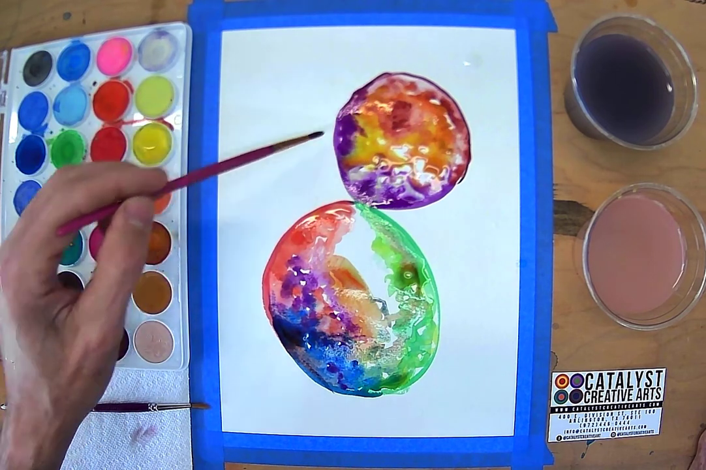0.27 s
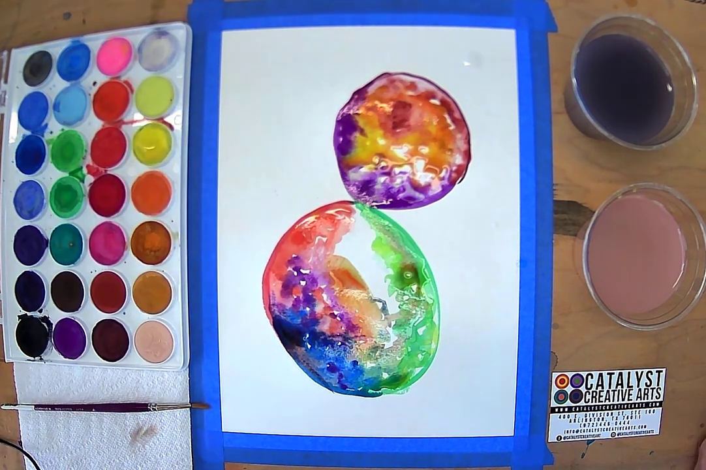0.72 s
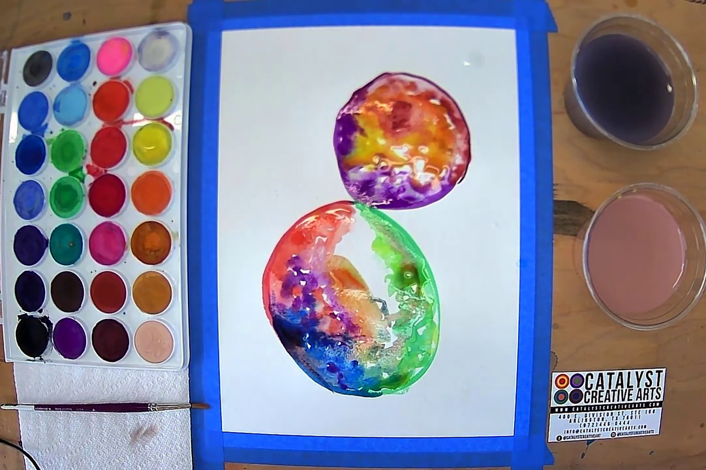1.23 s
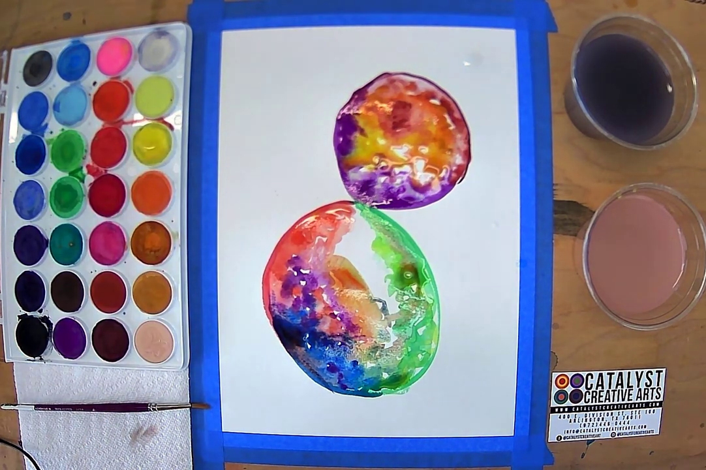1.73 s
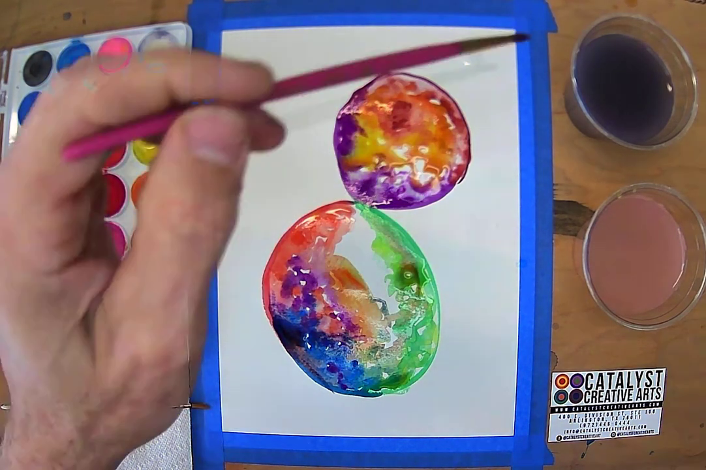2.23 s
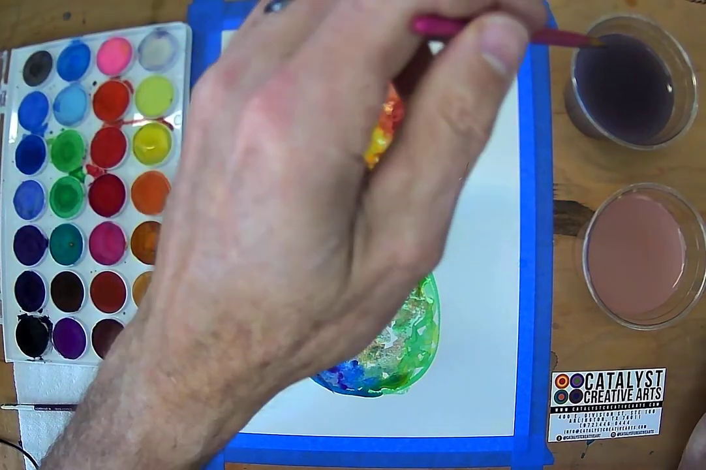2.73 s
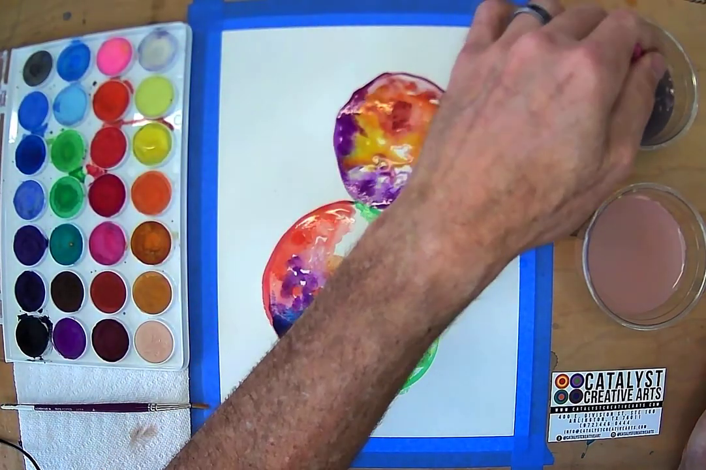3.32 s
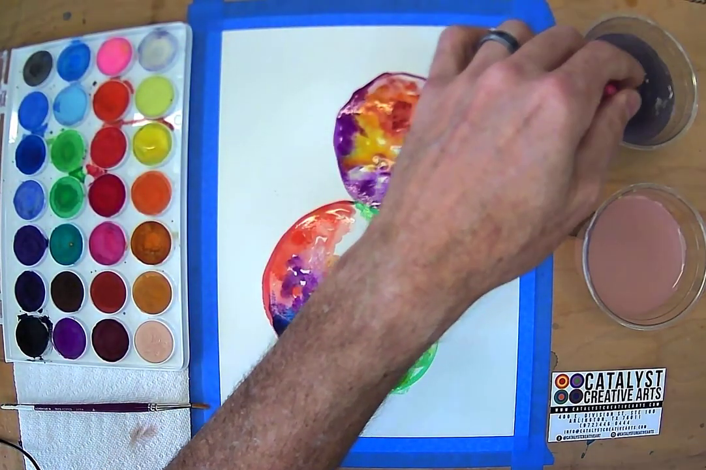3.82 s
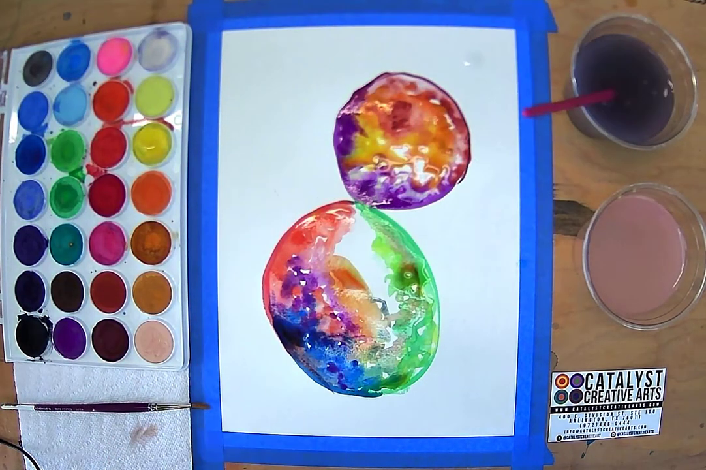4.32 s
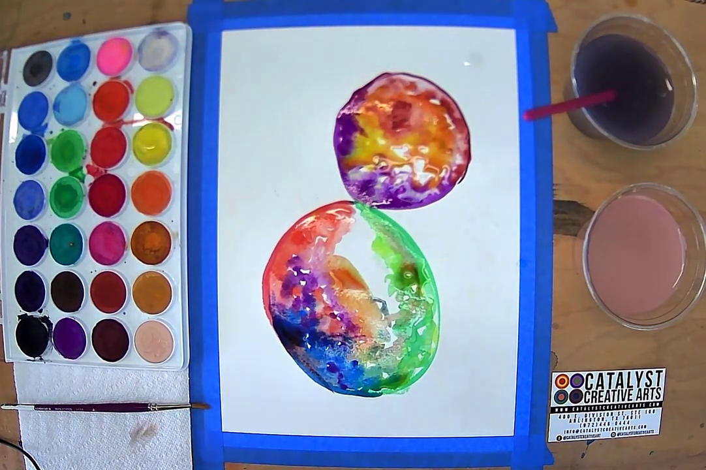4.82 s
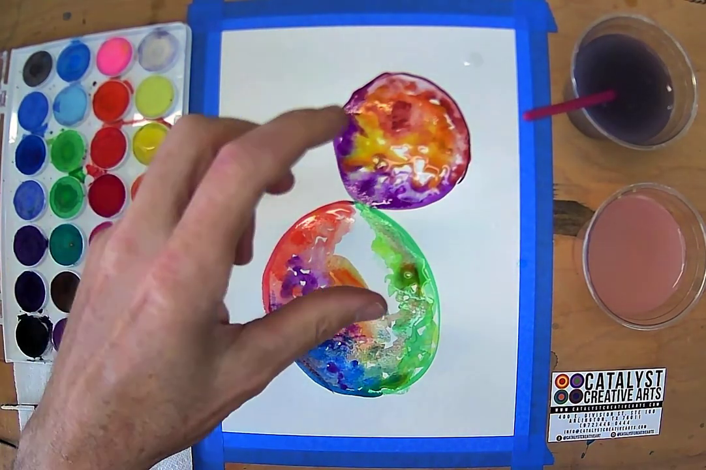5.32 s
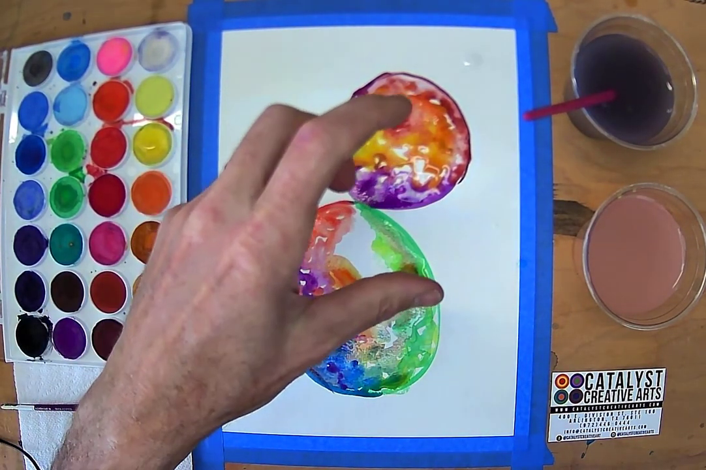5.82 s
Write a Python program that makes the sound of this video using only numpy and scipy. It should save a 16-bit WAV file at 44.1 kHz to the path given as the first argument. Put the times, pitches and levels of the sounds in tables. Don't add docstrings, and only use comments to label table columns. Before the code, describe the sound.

Close, mono sound of a painter's table indoors: steady low air noise and hum, a wooden tap and lighter flick, faint hissing bristles with tiny squeaks, a short hollow dragging judder. Later a dry wipe, a ringing plastic rim strike with fading rattles, then the brush drops hard, thumps the table and bounces; faint ticks follow.

```python
import sys
import numpy as np
from scipy import signal
from scipy.fft import rfft, irfft
from scipy.io import wavfile
from scipy.ndimage import uniform_filter1d

SR = 44100
rng = np.random.default_rng(int(sys.argv[2]) if len(sys.argv) > 2 else 0)


def voltage_ratio(level):
    return 10 ** (np.asarray(level, float) / 20)


def log_audio(samples):
    frames = np.atleast_2d(samples).T
    limited = np.clip(frames, -1, 1)
    pcm = np.round(limited * 32767).astype(np.int16)
    wavfile.write(sys.argv[1], SR, pcm)


N = 267417


def rms_one(x):
    return x / np.sqrt(np.mean(x ** 2) + 1e-20)


def at_hz(points, hz):
    table_hz, values = np.transpose(points)
    return np.interp(np.log(hz), np.log(table_hz), values)


def resonate(x, hz, width_hz):
    r = np.exp(-np.pi * width_hz / SR)
    poles = [1, -2 * r * np.cos(2 * np.pi * hz / SR), r * r]
    return signal.lfilter(np.array([1, 0, -1]) * (1 - r * r) / 2, poles, x)


def bandpass(x, order, low_hz, high_hz):
    return signal.sosfilt(signal.butter(order, [low_hz, high_hz], "band", fs=SR, output="sos"), x)


def body(x, peaks):
    return sum((-1) ** k * voltage_ratio(db) * resonate(x, hz, width) for k, (hz, width, db) in enumerate(peaks))


def drift(hz):
    r = np.exp(-2 * np.pi * hz / SR)
    noise = rng.standard_normal(N + SR)
    return rms_one(signal.lfilter([1], [1, -2 * r, r * r], noise)[SR:])


def add(out, sound, s):
    i = round(s * SR)
    out[i:i + len(sound)] += sound[:N - i]


def fade(t60, size):
    return voltage_ratio(-60 * np.arange(size) / SR / max(t60, .002))


def gesture_db(s, hold, db, fall, rise):
    t = np.arange(N) / SR
    return db - abs(rise) * np.maximum(s - t, 0) - abs(fall) * np.maximum(t - s - hold, 0)


def blows(events, peaks, echo, narrow, low_hz, top_hz):
    size = 4096
    out, t = np.zeros(N), np.arange(size) / SR
    for s, peak_db, chatter, wet_db in events:
        rough = rng.standard_normal(size) * (1 - np.exp(-t / 0.00049))
        rough[24] += 7
        knock = 0
        for k, (hz, width, db) in enumerate(peaks):
            push = rough * fade(chatter * (2000 / hz) ** 0.47, size)
            ring = resonate(resonate(push, hz, narrow * width), hz, 5 * width)
            knock = knock + (-1) ** k * voltage_ratio(db) * np.sqrt(width) * rms_one(ring)
        knock = bandpass(knock, 4, low_hz, top_hz)
        knock *= voltage_ratio(peak_db - 9.5) / np.std(knock[:300])
        add(out, knock, s - .0006)
        add(out, voltage_ratio(wet_db) * signal.fftconvolve(knock, echo), s)
    return out


def tap(echo):
    # start in seconds, peak in dB, contact chatter t60 in seconds, room share in dB
    tap_blows = [
        (0.709, -53, 0.024, -17),
        (0.7145, -32.5, 0.085, -11),
        (0.7175, -17.5, 0.02, -20),
    ]
    # resonance of handle and wood in Hz, width in Hz, level in dB
    tap_peaks = [(950, 300, -3.5), (1610, 210, 3), (2140, 140, -6), (2270, 160, -4), (2800, 190, -0.5),
                 (3420, 125, -1), (4220, 120, -4), (4990, 190, -6), (5600, 220, -4.5), (6230, 360, -7),
                 (7150, 81, -65), (7400, 350, -19)]
    return blows(tap_blows, tap_peaks, echo, narrow=0.98, low_hz=790, top_hz=8300)


def flick(echo):
    # start in seconds, peak in dB, contact chatter t60 in seconds, room share in dB
    flick_blows = [
        (0.9619, -45.5, 0.081, -15),
        (0.9734, -27, 0.018, -32),
    ]
    # resonance of the flicked handle in Hz, width in Hz, level in dB
    flick_peaks = [(1235, 98, 0.5), (1426, 200, 2.5), (1770, 250, -13), (4150, 170, 0), (4740, 100, 0),
                   (5330, 140, -1), (5770, 130, -3), (7050, 140, -7), (8050, 250, -15.5)]
    return blows(flick_blows, flick_peaks, echo, narrow=0.68, low_hz=1100, top_hz=9000)


def rim_knock(echo):
    # start in seconds, peak in dB, contact chatter t60 in seconds, room share in dB
    rim_blows = [
        (3.8822, -17, 0.022, -22),
        (3.901, -32, 0.035, -25),
    ]
    # resonance of the cup in Hz, width in Hz, level in dB
    rim_peaks = [(607, 75, -5), (865, 117, 4), (1122, 57, 9), (1320, 170, -2), (1760, 71, -8),
                 (1950, 124, 1), (2540, 104, 0.5), (3330, 430, -10), (4650, 120, -6), (5400, 240, -9.5),
                 (6650, 200, -16.5), (8250, 350, -21)]
    return blows(rim_blows, rim_peaks, echo, narrow=0.72, low_hz=634, top_hz=8850)


def rattle(echo):
    # start in seconds, peak in dB, contact chatter t60 in seconds, room share in dB
    rattle_blows = [
        (3.953, -33, 0.03, -9.5),
        (3.981, -36.5, 0.03, -26),
        (3.993, -40, 0.019, -16),
        (4.006, -42, 0.03, -27),
        (4.02, -46, 0.027, -20),
    ]
    # resonance of the rattling cup in Hz, width in Hz, level in dB
    rattle_peaks = [(894, 74, -1), (1147, 45, 2.5), (1320, 75, -8), (1960, 81, -10), (2490, 77, -14),
                    (3560, 300, -27), (4730, 250, -19.5), (5514, 300, -24), (7960, 400, -40)]
    return blows(rattle_blows, rattle_peaks, echo, narrow=1.5, low_hz=700, top_hz=8460)


def drop(echo):
    # start in seconds, peak in dB, contact chatter t60 in seconds, room share in dB
    drop_blows = [
        (4.4038, -22.5, 0.015, -22.5),
        (4.4054, -4.5, 0.013, -23.5),
        (4.409, -19, 0.01, -21.5),
    ]
    # resonance of cup and brush in Hz, width in Hz, level in dB
    drop_peaks = [(919, 100, 3.5), (1211, 77, -4), (1600, 120, 1), (2405, 110, 1.5), (3024, 130, -10),
                  (3820, 240, -2.5), (4900, 91, -8), (5250, 210, -8), (6300, 200, -5.5), (6510, 94, -15),
                  (7100, 540, -9), (8080, 420, -16.5), (9570, 210, -15), (10650, 270, -19),
                  (12000, 393, -20), (15200, 900, -27)]
    return blows(drop_blows, drop_peaks, echo, narrow=1.5, low_hz=790, top_hz=17500)


def bounce(echo):
    # start in seconds, peak in dB, contact chatter t60 in seconds, room share in dB
    bounce_blows = [
        (4.429, -37.5, .02, -26.5),
        (4.4328, -19, .01, -38),
    ]
    # resonance of the bouncing brush in Hz, width in Hz, level in dB
    bounce_peaks = [(1050, 280, -8), (2898, 280, -8), (3370, 98, -8.5), (4100, 430, -13.5), (5360, 180, 1),
                    (6250, 200, -5), (7745, 380, -6), (9800, 240, -15.5), (11600, 320, -8.5),
                    (15100, 510, -13.5)]
    return blows(bounce_blows, bounce_peaks, echo, narrow=2.4, low_hz=800, top_hz=16500)


def table_thump():
    # time in seconds, push in dB
    table_pushes = [
        (4.4081, 4.5),
        (4.417, -9.5),
        (4.43, -13.5),
    ]
    # table mode in Hz, level in dB, t60 in seconds
    table_modes = [(70.9, -38.5, .08), (110, -36, .1), (143, -40, .12), (193.2, -28, 0.096),
                   (297, -27.5, 0.04), (378, -34.5, 0.047)]
    pushes, out = np.zeros(N), np.zeros(N)
    for s, db in table_pushes:
        add(pushes, voltage_ratio(db) * np.hanning(40) / 20, s)
    for hz, db, t60 in table_modes:
        r, w = voltage_ratio(-60 / (t60 * SR)), 2 * np.pi * hz / SR
        poles = [1, -2 * r * np.cos(w), r * r]
        out += signal.lfilter([0, voltage_ratio(db) * np.sin(w)], poles, pushes + 1e-18)
    return out


def jar():
    # time in seconds, hollow tone in dB
    hand_pressure = [(1.2, -85), (1.232, -62), (1.292, -61), (1.344, -51), (1.464, -46.5), (1.532, -50.5),
                     (1.68, -61), (1.71, -64), (1.85, -69)]
    # lower hollow mode in Hz, width in Hz, level in dB
    low_modes = [(352, 29, -8), (475, 13, 4.5), (575, 20, -1.5)]
    # upper hollow mode in Hz, width in Hz, level in dB
    high_modes = [(686, 17, 9), (758, 43, 3.5), (800, 33, 1), (960, 31, -1.5)]
    # time of the top in seconds, peak in dB, tone in Hz, half-length in seconds
    jolts = [(1.237, -55, 588, 0.022), (1.24, -50.5, 474, 0.013), (1.355, -31, 475, 0.011),
             (1.398, -36, 500, 0.0027), (1.409, -35, 570, 0.005), (1.42, -31.5, 500, 0.0024),
             (1.428, -49, 437, 0.0046), (1.465, -32, 475, 0.011), (1.475, -37.5, 586, 0.0099),
             (1.489, -37.5, 532, 0.0031), (1.501, -41, 591, 0.0095), (1.511, -44, 693, 0.0037),
             (1.55, -38, 520, 0.0037), (1.579, -44.5, 572.5, 0.015), (1.592, -50.5, 790, 0.0065),
             (1.619, -46.5, 477.5, 0.042), (1.652, -46, 586, 0.008), (1.668, -50, 500, 0.0055)]
    low_jolts = [
        (1.278, -55, 100, .01),
        (1.292, -43, 91.3, 0.009),
        (1.374, -54, 105, 0.015),
        (1.399, -49, 101, 0.017),
    ]
    # start in seconds, hold in seconds, rumble in dB, fall in dB per s
    bumps = [
        (1.283, 0.016, -47.5, 401),
        (1.35, 0.064, -47.5, 600),
        (1.5, 0.025, -60.5, 400),
        (1.777, .015, -63, 300),
        (1.9, .02, -68, 300),
        (5.55, .5, -72, 100),
    ]
    t = np.arange(N) / SR
    friction = rng.standard_normal((3, N)) * voltage_ratio(2.2 * drift(30))
    low = rms_one(body(friction[0], low_modes))
    high = rms_one(body(friction[1], high_modes))
    rumble = rms_one(bandpass(friction[2], 2, 45, 130))

    drag_s, drag_db = np.transpose(hand_pressure)
    tone_db = np.interp(t, drag_s, drag_db, -150, -150)
    upper_db = -60 + np.interp(t - 0.053, t, tone_db) + 50.5
    low_gain, high_gain = uniform_filter1d(voltage_ratio(np.array([tone_db, upper_db])), size=300)
    rumble_gain = sum(voltage_ratio(gesture_db(*bump, rise=692)) for bump in bumps)
    out = low_gain * low + high_gain * high + rumble_gain * rumble
    for s, db, hz, half in jolts + low_jolts:
        out += voltage_ratio(db) * np.exp(-((t - s) / half) ** 2) * np.sin(2 * np.pi * hz * t)
    return out


def wipes():
    # start in seconds, hold in seconds, level in dB, fall in dB per s, lower resonance share in dB
    paper_strokes = [
        (0.73, .012, -52.5, 320, -1),
        (0.8, 0.064, -61.5, 500, -4.5),
        (2.378, 0.028, -43.5, 498, -18.5),
        (2.465, .06, -67, 250.5, 1),
    ]
    towel_strokes = [
        (0.98, 0.038, -53.5, 214, -5.5),
        (1.215, .01, -71, 252, 0),
        (1.412, .01, -69.5, 220, -6),
        (1.87, 0.18, -78.5, 350, 3),
        (3.57, 0.02, -79, 300, 8),
    ]
    cup_strokes = [
        (3.892, 0.0056, -61.5, 148, 3),
        (5.065, 0.028, -68, 600, -6),
        (5.665, 0.058, -78.5, 300, 2.5),
    ]
    # upper band in Hz, its width in Hz, lower resonance in Hz, its width in Hz
    paper, towel, cup = (6250, 1460, 4150, 450), (6180, 1600, 4380, 450), (6500, 2000, 4750, 200)
    # centre in Hz, width in Hz, level in dB
    outer_bands = [(1430, 420, 4), (8420, 680, -10.5)]
    clumps_db = [1.6 * drift(150) + 1.1 * drift(25) for band in range(3)]
    slips = rng.standard_normal((3, N)) * voltage_ratio(clumps_db)
    outer, out = body(slips[2], outer_bands), np.zeros(N)
    for strokes, surface in [(paper_strokes, paper), (towel_strokes, towel), (cup_strokes, cup)]:
        top_hz, top_width, hz, width = surface
        top = rms_one(bandpass(slips[0], 6, top_hz - top_width / 2, top_hz + top_width / 2))
        low = rms_one(resonate(resonate(slips[1], hz, width), hz, 2 * width)) + 3.0 * outer
        for *stroke, low_db in strokes:
            gain = uniform_filter1d(voltage_ratio(gesture_db(*stroke, rise=4000)), size=80)
            out += gain * (top + voltage_ratio(low_db) * low)
    return out


def squeaks():
    # start in seconds, length in seconds, peak in dB, first pitch in Hz, last pitch in Hz
    glides = [
        (0.809, 0.036, -64, 4550, 4750),
        (1.0, 0.069, -58, 5350, 6050),
        (2.426, 0.027, -64, 5900, 6200),
        (2.5, 0.051, -66, 4150, 4550),
    ]
    out = np.zeros(N)
    flutter_filter = signal.butter(2, 110, fs=SR, output="sos")
    for s, length, db, from_hz, to_hz in glides:
        size = int(length * SR)
        flutter = signal.sosfilt(flutter_filter, rng.standard_normal((2, 6000)))[:, -size:]
        phase = 2 * np.pi * np.cumsum(np.linspace(from_hz, to_hz, size)) / SR
        squeak = rms_one(flutter[0] * np.sin(phase) + flutter[1] * np.cos(phase))
        add(out, voltage_ratio(db) * np.hanning(size) ** .5 * squeak, s)
    return out


def ticks():
    # start in seconds, peak in dB, pitch in Hz, t60 in seconds
    specks = [(0.679, -53, 6200, 0.09), (0.78, -53, 1600, 0.083), (0.794, -45.5, 6250, 0.022),
              (0.86, -52, 6370, .03), (1.343, -50, 520, .03), (1.546, -54, 560, .025),
              (2.629, -48.5, 3980, 0.028), (2.636, -48, 4770, 0.065), (2.637, -55, 1450, 0.054),
              (3.491, -56, 1600, 0.035), (3.592, -58, 4900, .03), (3.974, -60, 5100, 0.026),
              (3.982, -50, 4750, 0.025), (3.983, -63, 5800, .03), (4.401, -39, 5600, .02),
              (4.4012, -31.5, 1540, .03), (4.42, -32, 1000, .025), (4.508, -49, 278, 0.046),
              (5.068, -54, 6800, 0.045), (5.072, -55, 4750, .05), (5.09, -52.5, 4750, .04)]
    out = np.zeros(N)
    for s, db, hz, t60 in specks:
        contact = rng.standard_normal(3000) * fade(t60, 3000)
        tick = resonate(resonate(contact, hz, 260), hz, 600)
        add(out, voltage_ratio(db) * tick / np.abs(tick).max(), s)
    return out


def room_echo():
    # frequency in Hz, t60 in seconds
    room_t60 = [(200, 0.24), (1200, 0.27), (4000, 0.13), (9000, .12), (16000, .09)]
    size, rise_s, hold_s = SR // 2, .018, .05
    edges = 60 * 2. ** np.arange(9)
    echo = 0
    for low, high in zip(edges, edges[1:]):
        band = bandpass(rng.standard_normal(size), 2, low, high)
        t60 = at_hz(room_t60, np.sqrt(low * high))
        decay = np.minimum(fade(t60, size) * voltage_ratio(60 * hold_s / t60), 1)
        dulling = voltage_ratio(-1.5 * np.log2(low / 1000))
        echo = echo + dulling * band * decay
    echo = echo * np.clip(np.arange(size) / SR / rise_s, 0, 1)
    return echo / np.sqrt(np.sum(echo ** 2))


def ventilation(stir_db):
    # frequency in Hz, density in dB per Hz
    air = [(14, -58), (40, -21), (100, -9), (200, -5.5), (300, -10), (600, -18.5), (1000, -16.5),
           (2000, -22.5), (3060, -15), (4200, -26.5), (6700, -31.5), (7700, -46.5), (11000, -51),
           (16500, -56.5)]
    # centre in Hz, width in Hz, level in dB
    duct_peaks = [(484, 97, 3), (880, 67, 3), (2500, 250, 1.5), (3130, 1200, 1.5)]
    hz = np.maximum(np.fft.rfftfreq(N, 1 / SR), 1)
    shape_db = at_hz(air, hz)
    for f, width, db in duct_peaks:
        shape_db = shape_db + db / (1 + (2 * (hz - f) / width) ** 2)
    middle = (hz > 1000) & (hz < 5000)
    shape = voltage_ratio(shape_db) / np.sqrt(np.sum(voltage_ratio(2 * shape_db)[middle]) / len(hz))
    out = voltage_ratio(-66 + stir_db) * irfft(rfft(rng.standard_normal(N)) * shape, N)
    bass = signal.sosfiltfilt(signal.butter(2, 910, fs=SR, output="sos"), out)
    still = uniform_filter1d(1. * (np.arange(N) < 0.69 * SR), size=4000)
    return out - (1 - voltage_ratio(-4.5)) * bass * still


def room_modes(stir_db):
    mode_hz = (118.73, 154.2)
    width_hz, evening = 3.9, .6
    levels_db = [-70 + 1.76 * stir_db, -84.5 + 3.5 * np.arange(N) / SR]
    out = np.zeros(N)
    for hz, db in zip(mode_hz, levels_db):
        mode = resonate(resonate(rng.standard_normal(N + SR), hz, width_hz), hz, 3 * width_hz)[SR:]
        swell = uniform_filter1d(mode ** 2, size=2000) + 1e-12
        out += voltage_ratio(db) * rms_one(mode / swell ** (evening / 2))
    return out


def motor_hum():
    # frequency in Hz, level in dB rms
    hum_lines = [
        (411.5, -68.5),
    ]
    out = np.zeros(N)
    for hz, db in hum_lines:
        level = np.sqrt(2) * voltage_ratio(db + .4 * drift(4))
        out += level * np.sin(2 * np.pi * np.cumsum(hz + .3 * drift(3)) / SR)
    return out


def background():
    # start in seconds, hold in seconds, swell in dB, fall in dB per s
    stirs = [
        (0.898, 0.56, 3.5, 12.5),
        (2.318, 0.22, 2.04, 5),
        (3.953, 0.056, 3, 11),
    ]
    stir_db = np.max([np.maximum(gesture_db(*stir, rise=19), 0) for stir in stirs], axis=0)
    return ventilation(stir_db) + room_modes(stir_db) + motor_hum()


def scene():
    echo = room_echo()
    knocks = tap(echo) + flick(echo) + rim_knock(echo) + rattle(echo) + drop(echo) + bounce(echo)
    return (knocks + table_thump() + jar() + wipes() + squeaks() + ticks() + background())[None]


def top_cut(x):
    return signal.sosfilt(signal.butter(12, 16800, fs=SR, output="sos"), x)


def record(dry):
    # start in seconds, end in seconds, lower edge of the missing treble in Hz
    treble_gaps = [
        (0.737, 0.883, 7300),
        (2.43, 2.48, 7600),
        (5.06, 5.118, 7600),
    ]
    mix = signal.sosfilt(signal.butter(2, 45, "high", fs=SR, output="sos"), dry)
    mix = signal.sosfilt(signal.cheby2(12, 60, 16800, fs=SR, output="sos"), mix)
    t, hz = np.arange(N) / SR, np.fft.rfftfreq(N, 1 / SR)
    for start, stop, above_hz in treble_gaps:
        gone = uniform_filter1d(1. * ((t > start) & (t < stop)), size=500)
        treble = irfft(rfft(mix) * ((hz > above_hz) & (hz < 11500)), N)
        mix = mix - gone * treble
    return top_cut(mix)


dry = scene()
out = record(dry)
log_audio(out)
```